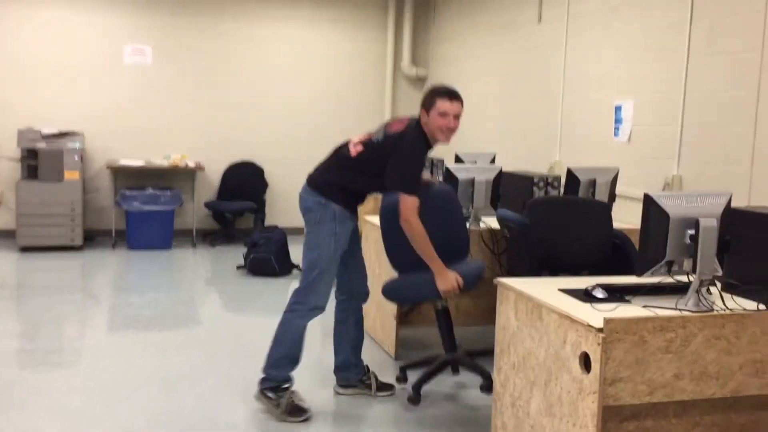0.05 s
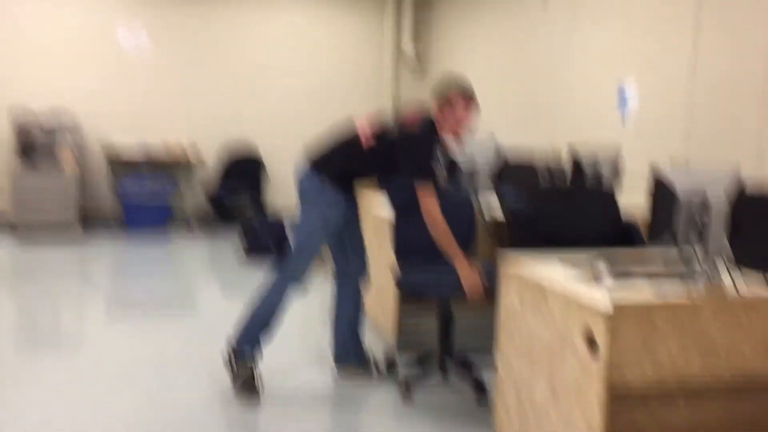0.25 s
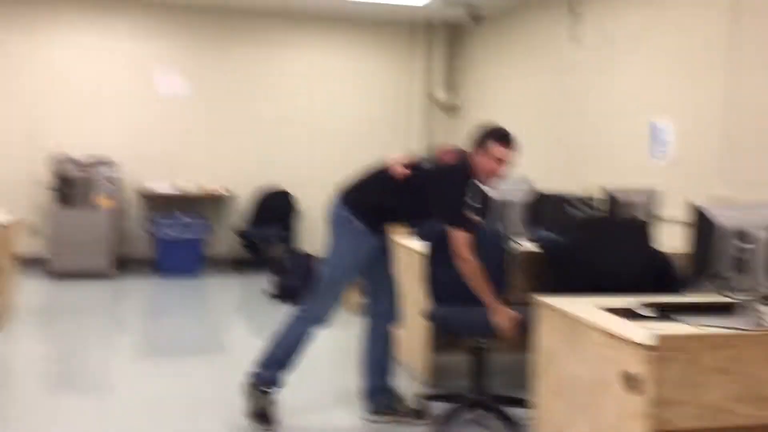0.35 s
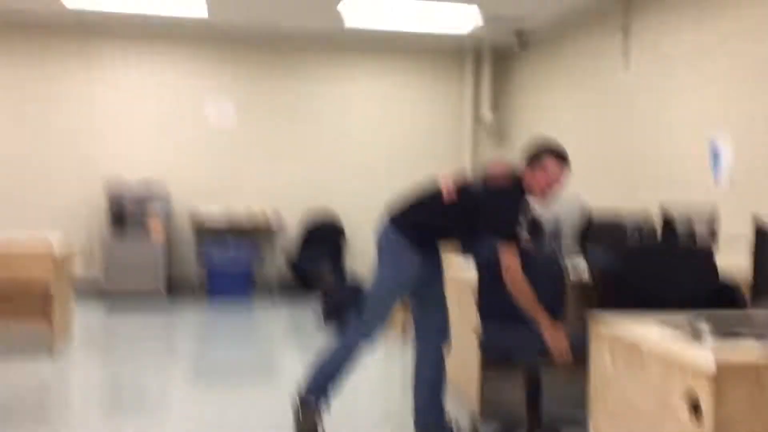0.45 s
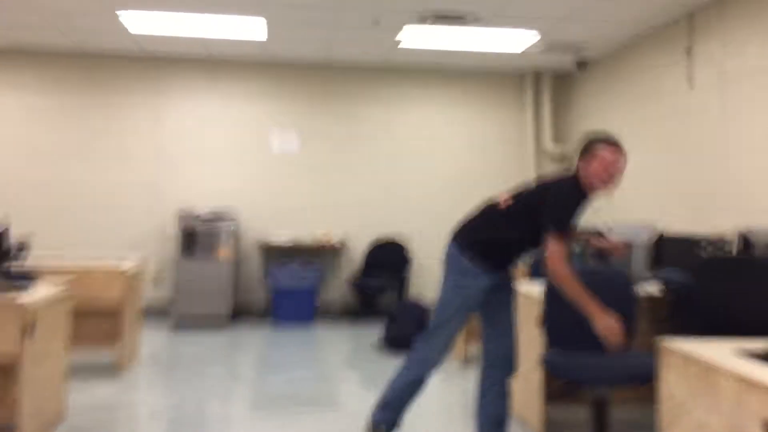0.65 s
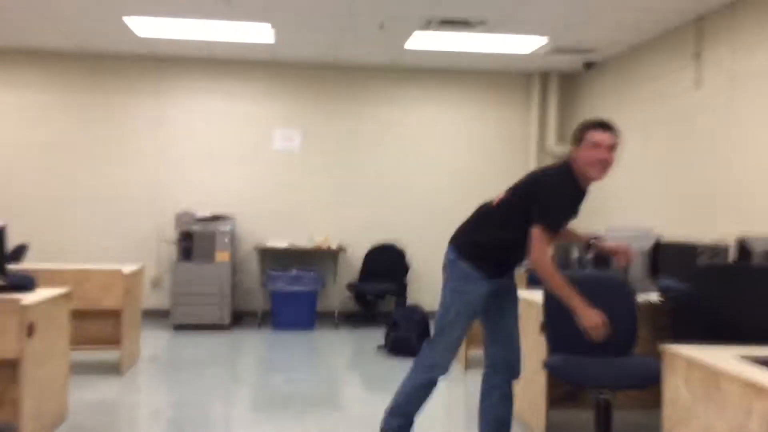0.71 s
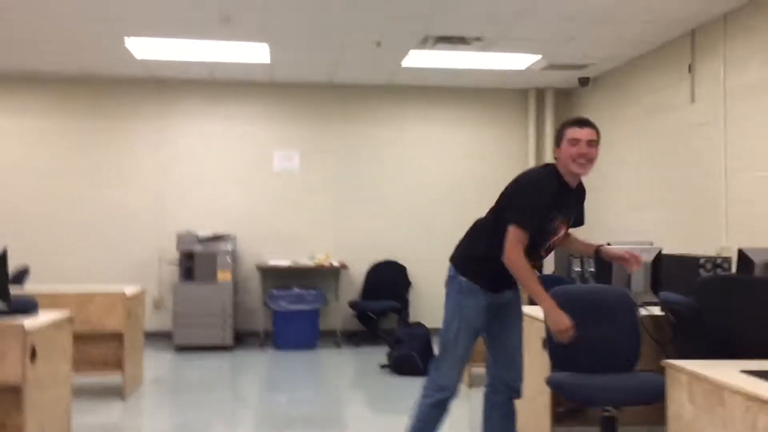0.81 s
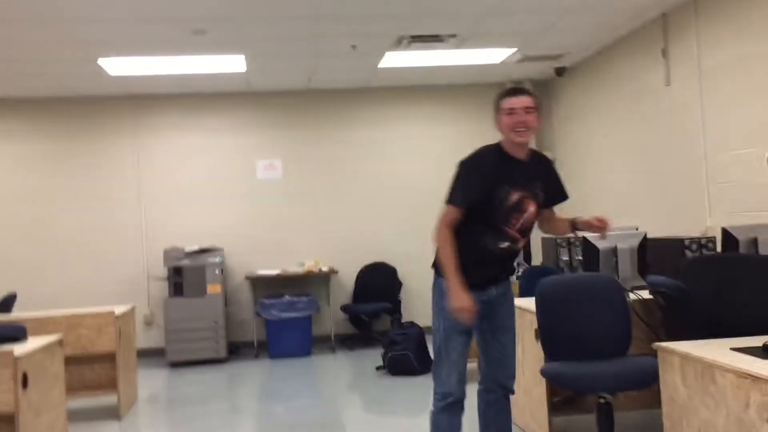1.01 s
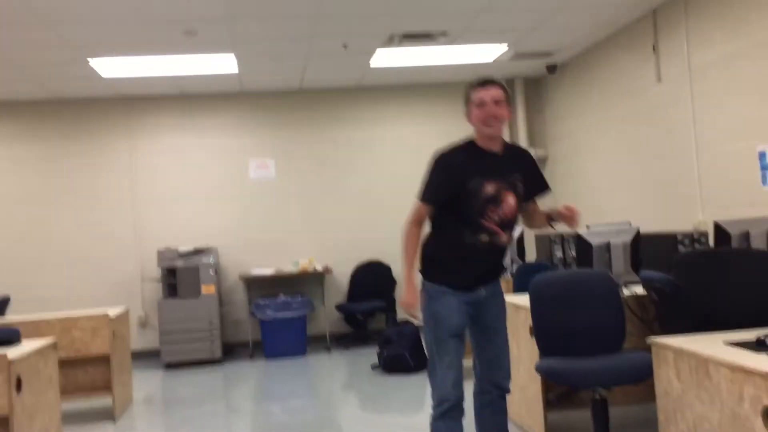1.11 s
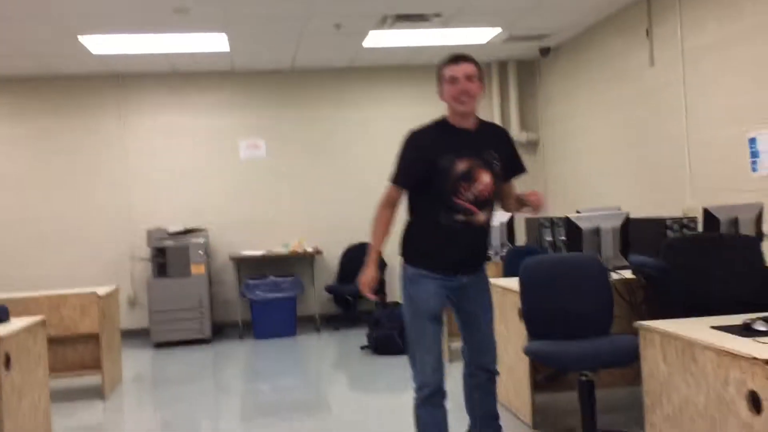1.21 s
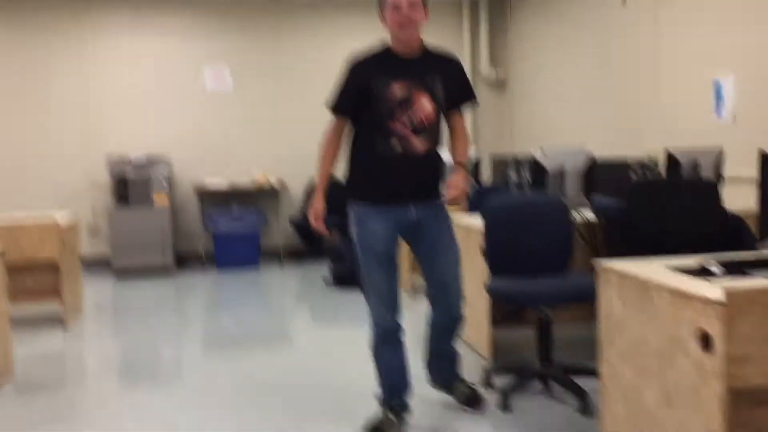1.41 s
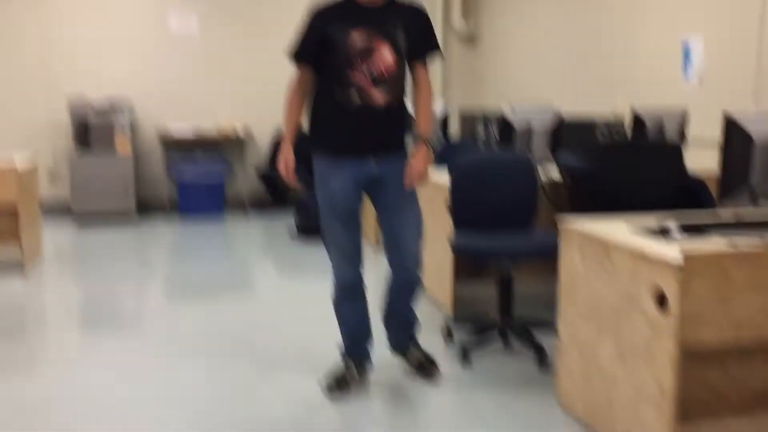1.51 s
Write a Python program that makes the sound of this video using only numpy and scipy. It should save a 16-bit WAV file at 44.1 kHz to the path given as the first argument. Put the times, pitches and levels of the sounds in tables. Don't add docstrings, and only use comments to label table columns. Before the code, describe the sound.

A swivel office chair is set down on hard tile. A faint caster scuff fades until 0.24 seconds, when sharp plastic knocks begin; the loudest clatter comes around 0.39 to 0.47, with hollow boom and bright room ring. A duller settling rub follows at 0.56 to 0.75, a small phone tap near 0.78, then near quiet to about 1.5 with low air rumble, soft steps, faint squeaks and ticks.

```python
import sys
import numpy as np
from scipy import signal
from scipy.fft import rfft, irfft
from scipy.io import wavfile
from scipy.ndimage import uniform_filter1d

SR = 44100
rng = np.random.default_rng(int(sys.argv[2]) if len(sys.argv) > 2 else 0)


def int16_out(signal):
    q = np.round(np.clip(np.atleast_2d(signal).T, -1, 1) * 32767)
    wavfile.write(sys.argv[1], SR, q.astype(np.int16))


N = 68355

# frequency in Hz, level in dB per Hz.
CRACK_COLOUR = [(180, -36.5), (300, -7.5), (842, -7.5), (1150, -7), (1320, -6.5), (2700, -1.5),
                (4990, -8.5), (11500, -16.5), (16000, -23.5)]


def gain_of(db):
    return 10 ** (np.asarray(db) / 20)


def evened(x):
    return x / np.sqrt(np.mean(x ** 2) + 1e-20)


def read(points, hz):
    f, value = np.transpose(points)
    return np.interp(np.log(hz + 1), np.log(f + 1), value)


def follow(points):
    s, db = np.transpose(points)
    return gain_of(np.interp(np.arange(N) / SR, s, db, left=-150, right=-150))


def add(mix, s, sound):
    part = mix[round(s * SR):][:len(sound)]
    part += sound[:len(part)]


def coloured(x, points):
    hz = np.fft.rfftfreq(len(x), 1 / SR)
    inside = (hz >= points[0][0]) & (hz <= points[-1][0])
    gain = gain_of(read(points, hz)) * np.where(inside, 1, 0.05)
    return irfft(rfft(x) * gain, len(x))


def resonate(x, hz, width_hz):
    r = np.exp(-np.pi * width_hz / SR)
    return signal.lfilter([1 - r, 0, r - 1], [1, -2 * r * np.cos(2 * np.pi * hz / SR), r * r], x)


def resonate_twice(x, hz, width_hz):
    return resonate(resonate(x, hz, width_hz), hz, width_hz)


def ring(hz, db, t60, t):
    return gain_of(db - 60 * t / t60) * np.sin(2 * np.pi * hz * t)


def wavelets(table):
    out = np.zeros(N)
    for s, db, hz, cycles in table:
        u = np.arange(0, cycles / hz, 1 / SR) * hz
        add(out, s, gain_of(db) * np.sin(np.pi * u / cycles) * np.sin(2 * np.pi * u))
    return out


def scuff():
    # frequency in Hz, width in Hz, level in dB.
    modes = [(342, 120, 0.5), (696, 63, 1), (1027, 160, 3), (1870, 285, 8), (2800, 300, -7.5),
             (3990, 175, -2.5), (5470, 140, -5.5)]
    # frequency in Hz, width in Hz, level in dB.
    early_modes = [(2110, 96, 14), (3000, 130, 7), (558, 44, 7)]
    # time in seconds, level in dB.
    slide_level = [
        (0, -55),
        (.03, -57.5),
        (.05, -54),
        (.17, -58),
        (.22, -64),
        (.245, -55),
    ]
    # time in seconds, level in dB.
    settle_level = [
        (.56, -56),
        (.63, -54),
        (.65, -51.5),
        (.70, -56),
        (.755, -63),
        (.77, -63.5),
    ]
    # frequency in Hz, level in dB.
    settle_colour = [(300, 5.5), (700, 6), (1100, -14), (1900, 1.5), (7000, -1.5), (9000, -7.5),
                     (16000, -31)]
    air_db, early_fade_s = -5, 0.41

    noise = rng.standard_normal(N)
    tones = sum(gain_of(db) * resonate(noise, hz, width) for hz, width, db in modes)
    early = sum(gain_of(db) * resonate(noise, hz, width) for hz, width, db in early_modes)
    tones = tones + early * gain_of(-60 * (np.arange(N) / SR / early_fade_s) ** 2 * 10)
    rub = evened(tones) + gain_of(air_db) * evened(coloured(noise[::-1], CRACK_COLOUR))
    return follow(slide_level) * rub + follow(settle_level) * coloured(rub, settle_colour)


def ventilation():
    # frequency in Hz, level in dB per Hz.
    hiss_colour = [(190, -38), (330, -10.5), (512, -4), (755, -4.5), (1100, -9.5), (1520, -5.5),
                   (2700, -17), (3600, -14), (16000, -28.5)]
    # frequency in Hz, level in dB per Hz.
    rumble_colour = [(12, -43), (20, -14.5), (34, -3), (97, -1.5), (154, 1), (230, -12), (275, -10.5),
                     (400, -14.5), (520, -48), (880, -120)]
    # time in seconds, level in dB.
    gusts = [(0, -57), (.17, -56), (.2, -57.5), (.235, -64), (.27, -50.5), (.456, -47.5), (.6, -54.5),
             (.72, -59.5), (.8, -67.5), (1.0, -68.5), (1.1, -66.5), (1.25, -66), (1.4, -62), (1.46, -69.5),
             (1.55, -60)]
    hiss_db, whistle_db = -72, -81

    hiss_noise, rumble_noise, whistle_noise, lump_noise = rng.standard_normal((N, 4)).T
    hiss = gain_of(hiss_db) * evened(coloured(hiss_noise, hiss_colour))
    slow = uniform_filter1d(uniform_filter1d(lump_noise, 900), 900)
    lumps = gain_of(2.5 * evened(slow))
    rumble = follow(gusts) * lumps * evened(coloured(rumble_noise, rumble_colour))
    whistle = gain_of(whistle_db) * evened(resonate_twice(whistle_noise, 1690, 330))
    return hiss + rumble + whistle


def floor_steps():
    # start in seconds, peak in dB, frequency in Hz, length in cycles.
    steps = [(.002, -47.5, 161, 7), (.070, -51.5, 159.6, 12), (.150, -47.5, 157, 4.6), (.445, -39, 70, 2),
             (.460, -40.5, 184, 2.8), (.482, -33.5, 277, 7.7), (.7425, -44.5, 102.7, 1.92),
             (.830, -54, 99, 2.66), (.912, -54, 120.7, 1.6), (1.078, -55, 147.6, 3),
             (1.122, -52, 167.6, 3.4), (1.210, -59, 52, 2.5), (1.275, -57, 120, 2.2),
             (1.335, -57.5, 140, 3.6), (1.487, -54, 256.3, 2.5), (1.497, -51, 142.7, 6)]
    return wavelets(steps)


def chair():
    # start in seconds, clack in dB, clack in Hz, crack in dB, base thump in dB.
    knocks = [(0.241, -35.5, 2667, -35, -51.5), (.2450, -28.5, 3410, -30, -46),
              (0.249, -35.5, 2030, -33, -35.5), (0.2562, -33, 4340, -34, -43.5),
              (.2630, -34.5, 2660, -39.5, -39.5), (.2740, -37.5, 2610, -40, -42.5),
              (.2850, -39, 2220, -42.5, -42), (0.3157, -40, 3340, -33.5, -46),
              (0.3218, -38.5, 2300, -35.5, -52.5), (0.326, -35.5, 3230, -31, -42.5),
              (0.3312, -38.5, 7100, -34, -42.5), (.336, -40, 5500, -37, -51),
              (0.3424, -26.5, 3004, -36, -38), (.3460, -29, 2500, -37, -39),
              (0.3546, -37, 3086, -39.5, -51.5), (0.361, -30.5, 3600, -37.5, -52),
              (.367, -36, 2300, -47.5, -49.5), (.378, -37.5, 2600, -44.5, -52.5),
              (0.3938, -20, 2595, -25, -40), (0.3988, -25, 3300, -25, -36), (0.402, -29, 3280, -23, -37),
              (.4035, -27, 2640, -24.5, -37), (0.408, -26.5, 2200, -28, -34.5),
              (.4090, -27, 11370, -29, -39.5), (.4210, -23, 2790, -32.5, -36), (.430, -27, 2600, -34, -38),
              (.4450, -32.5, 2710, -36.5, -36.5), (0.459, -27, 2800, -40.5, -37.5),
              (.4680, -35.5, 4280, -44, -39.5), (.4900, -46, 2620, -42.5, -33.5)]
    # frequency in Hz, level in dB, t60 in seconds.
    spoke_modes = [(1368, -12, 0.056), (1958, -5, 0.035), (2281, -5, .06), (2640, -8, 0.072),
                   (3410, -3, 0.098), (4534, -9.5, 0.03), (5500, -10.5, .06), (6770, -22.5, 0.039),
                   (9400, -24.5, .08), (11350, -27.5, 0.033)]
    # frequency in Hz, level in dB, t60 in seconds.
    base_modes = [(70, -28, 0.2), (130, -22, 0.12), (241, -1.5, 0.095), (279.3, -5.5, 0.072),
                  (365.4, -3.5, 0.071), (489.2, -8.5, 0.12), (576, -14.5, 0.16), (660.5, 0, 0.053),
                  (852, -12.5, 0.058), (965, -5, 0.069)]
    crack_s, crack_rise_s, thump_rise_s = 0.0045, 0.00033, 0.0077
    clack_t60, clack_spread_hz = 0.04, 280
    spokes_db, spoke_spread, spoke_spread_db = -10.5, 0.045, 7
    boom_spread, boom_spread_db = 0.1, 4
    dull_per_db = 0.24

    t = np.arange(SR // 4) / SR
    body, clacks = np.zeros(N), np.zeros(N)
    crack_shape = np.exp(-t / crack_s) * np.minimum(t / crack_rise_s, 1)
    hardest_db = max(row[3] for row in knocks)
    for s, clack_db, clack_hz, crack_db, thump_db in knocks:
        dull = dull_per_db * (hardest_db - crack_db)
        colour = [(f, d - dull * max(np.log2(f / 5000), 0)) for f, d in CRACK_COLOUR]
        crack = evened(coloured(rng.standard_normal(len(t)), colour)) * crack_shape

        luck = rng.uniform(-1, 1, (3, len(spoke_modes) + len(base_modes)))
        clack = sum(ring(clack_hz + clack_spread_hz * b, -11, clack_t60, t) for b in (0, *luck[2, :3]))
        spokes = sum(ring(f * (1 + spoke_spread * b), d + spoke_spread_db * a, t60, t) * np.sign(c)
                     for (f, d, t60), (a, b, c) in zip(spoke_modes, luck.T))
        boom = sum(ring(f * (1 + boom_spread * b), d + boom_spread_db * a, t60, t) * np.sign(c)
                   for (f, d, t60), (a, b, c) in zip(base_modes, luck.T[len(spoke_modes):]))

        add(clacks, s, gain_of(clack_db) * clack)
        sharp = gain_of(crack_db) * (crack + gain_of(spokes_db) * spokes)
        thump = gain_of(thump_db) * (1 - np.exp(-t / thump_rise_s)) * boom
        add(body, s, sharp + thump)
    return body, clacks


def panels():
    # start in seconds, peak in dB, frequency in Hz, length in cycles.
    panel_rings = [(.243, -39.5, 358, 7.9), (.262, -39.5, 593, 12), (.272, -42.5, 710, 16),
                   (.308, -48, 860, 16), (0.31, -42, 336, 5.2), (.400, -33, 856, 22),
                   (.400, -32.5, 380.6, 9), (.400, -37, 250, 5.1), (.405, -33.5, 570, 24),
                   (.412, -38.5, 1118, 24), (.425, -36.5, 280, 9.5), (.455, -36, 500, 18),
                   (.475, -39, 400, 17), (.4655, -37.5, 6900, 75), (.3935, -27.5, 2600, 35),
                   (.407, -28, 2080, 20), (.400, -32, 6400, 46), (.399, -34.5, 8600, 68),
                   (0.34, -38, 5900, 32), (.326, -39, 6900, 61), (.243, -40, 5500, 55),
                   (.244, -36.5, 3400, 28), (.440, -33.5, 2700, 68), (.450, -37, 240, 8),
                   (0.39, -34, 2600, 35)]
    return wavelets(panel_rings)


def room(x):
    # frequency in Hz, t60 in seconds.
    decay = [(100, .9), (300, 0.78), (1000, 0.72), (2500, 0.51), (5500, 0.43), (9000, 0.36), (14000, 0.35)]
    # time in seconds, level in dB.
    gate = [
        (0, 0.5),
        (.69, 0),
        (.80, -12.5),
        (1.55, -8),
    ]
    room_db, rise_s, turns_per_s = -2.5, 0.0054, 9

    echoes = np.zeros((2, SR))
    at = np.arange(100, SR - 20, 20) + rng.integers(0, 20, (2, (SR - 101) // 20))
    np.put_along_axis(echoes, at, rng.choice([-1., 1.], at.shape), 1)
    hz, t, z = signal.stft(echoes, SR, nperseg=256)
    fade = gain_of(-60 * t / read(decay, hz)[:, None])
    tail = signal.istft(z * fade, SR, nperseg=256)[1]
    tail *= np.minimum(np.arange(tail.shape[1]) / SR / rise_s, 1)

    turn = 2 * np.pi * turns_per_s * np.arange(N) / SR
    feeds = x * np.array([np.cos(turn), np.sin(turn)])
    wet = signal.fftconvolve(feeds, tail / np.linalg.norm(tail[0]), axes=1)[:, :N].sum(0)
    return gain_of(room_db) * follow(gate) * wet


def finger_crackle():
    # time in seconds, level in dB.
    grip_level = [
        (.772, -71),
        (.777, -69.5),
        (.824, -75),
        (.835, -88),
    ]
    ticks_per_s = 500
    ticks = rng.standard_normal(N) * (rng.random(N) < ticks_per_s / SR)
    return follow(grip_level) * evened(resonate_twice(ticks, 1900, 1800))


def phone_taps():
    # start in seconds, peak in dB, frequency in Hz, length in cycles.
    case_taps = [(.7770, -55, 2100, 3), (.7784, -37.5, 520, 1.05), (.7785, -52, 1500, 2),
                 (.7790, -56, 2200, 14), (.7775, -58, 3600, 2), (.7783, -56, 8000, 1.2),
                 (.7805, -47, 150, 1.2), (.7841, -46, 500, .6), (.7935, -58, 1100, 2),
                 (.7990, -53, 600, 1.2), (.8000, -56, 200, 1.6), (.7995, -57, 2300, 1.5),
                 (.8115, -58, 1950, 11), (.8255, -56, 1500, 1.5)]
    return wavelets(case_taps)


def bearing_squeaks():
    # start in seconds, peak in dB, frequency in Hz, length in cycles.
    squeaks = [(.855, -73, 1703, 43), (.870, -76, 1610, 30), (.895, -72.5, 1720, 28),
               (.955, -71.5, 1744, 50), (.968, -64.5, 1530, 38), (1.025, -72, 1620, 45),
               (1.085, -73.5, 1630, 40), (1.110, -69.5, 1730, 40), (1.132, -68, 1804, 43),
               (1.160, -67, 1724, 50), (1.300, -81.5, 1670, 50), (1.393, -68, 1690, 44),
               (1.412, -62, 1702, 65), (1.440, -74, 1690, 40), (1.465, -67.5, 1730, 72)]
    return wavelets(squeaks)


def rustle():
    # start in seconds, level in dB, frequency in Hz.
    part_ticks = [(1.144, -73, 4260), (1.166, -65.5, 2370), (1.172, -65, 1235), (1.174, -64, 1414),
                  (1.174, -64, 5500), (1.177, -71, 6510), (1.177, -65, 4400), (1.181, -62, 3074),
                  (1.187, -68, 2200), (1.197, -66, 3000), (1.193, -70, 5470)]
    # frequency in Hz, level in dB per Hz.
    tick_colour = [(1100, -13), (3000, 5.5), (6000, -1.5), (8000, -14)]
    t60, wide_db, rise_s = 0.1, -7, 0.0024

    t, out = np.arange(SR // 10) / SR, np.zeros(N)
    for s, db, hz in part_ticks:
        noise = evened(coloured(rng.standard_normal(len(t)), tick_colour))
        wide = gain_of(wide_db - 60 * t / t60) * noise
        tick = ring(hz, db, t60, t) + gain_of(db) * wide
        add(out, s, tick * np.minimum(t / rise_s, 1))
    return out


def scene():
    clack_send_db = -9
    background = scuff() + ventilation() + floor_steps()
    body, clacks = chair()
    clacks = clacks + panels()
    wet = room(body + gain_of(clack_send_db) * clacks)
    small = finger_crackle() + phone_taps() + bearing_squeaks() + rustle()
    return (background + body + clacks + wet + small)[None]


def roll_off(x):
    return signal.sosfilt(signal.butter(12, 16430, fs=SR, output="sos"), x)


def record(dry):
    mic_low_hz, edge_hz = 53.3, 16000
    over_db, depth_db = 8.5, -1

    heard = signal.lfilter(*signal.butter(2, mic_low_hz, "high", fs=SR), dry[0])
    hz, _, z = signal.stft(heard, SR, nperseg=512, noverlap=384)
    power = uniform_filter1d(abs(z) ** 2, size=9, axis=0)
    power = uniform_filter1d(power, size=7, axis=1) + 1e-20
    noise = np.percentile(power, 15, axis=1, keepdims=True) * gain_of(2 * over_db)
    keep = np.maximum(power / (power + noise), gain_of(depth_db))
    keep = keep * gain_of(-40 * (hz > edge_hz))[:, None]
    clean = signal.istft(z * keep, nperseg=512, noverlap=384)[1][:N]
    return roll_off(clean[None])


dry = scene()
out = record(dry)
int16_out(out)
```